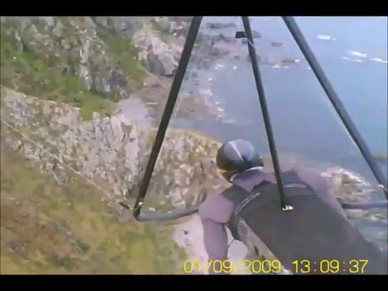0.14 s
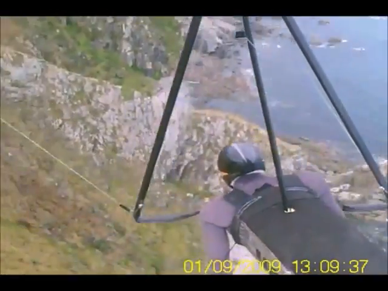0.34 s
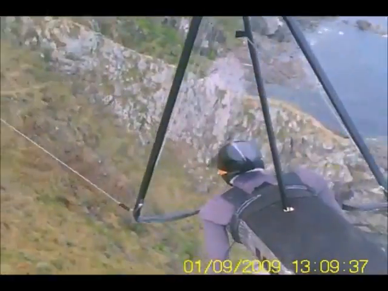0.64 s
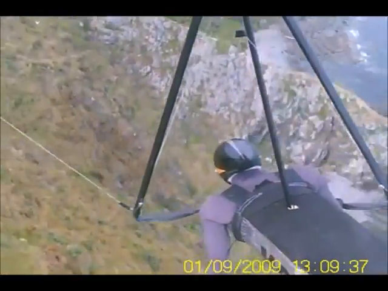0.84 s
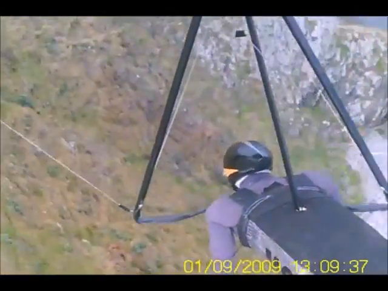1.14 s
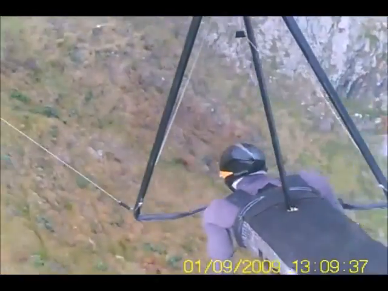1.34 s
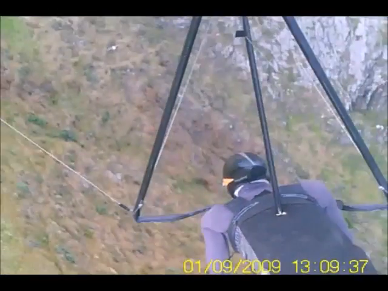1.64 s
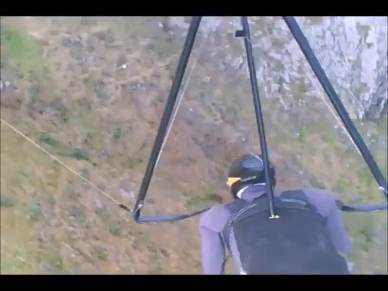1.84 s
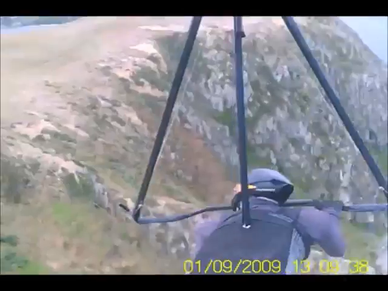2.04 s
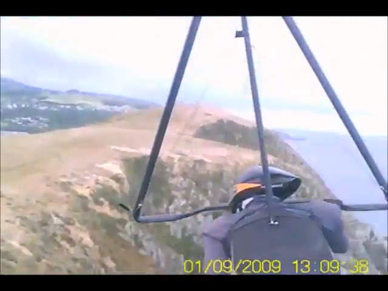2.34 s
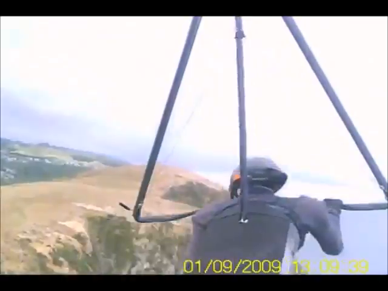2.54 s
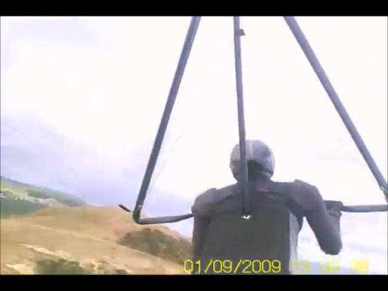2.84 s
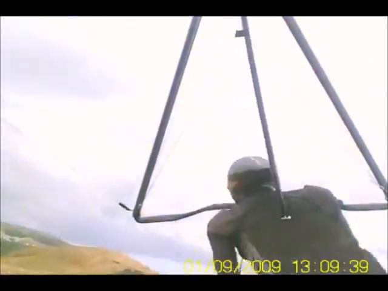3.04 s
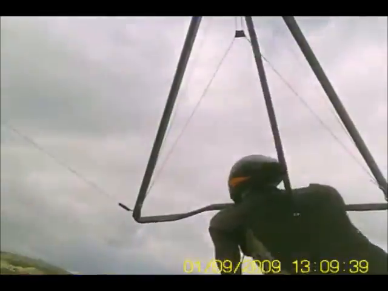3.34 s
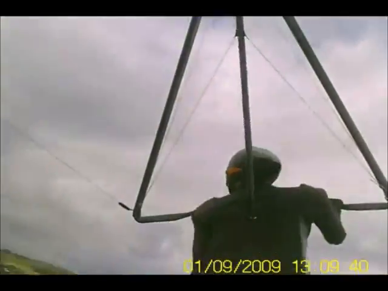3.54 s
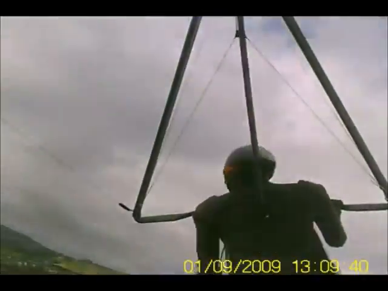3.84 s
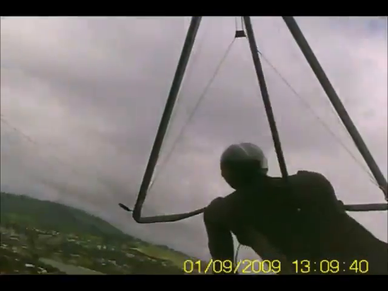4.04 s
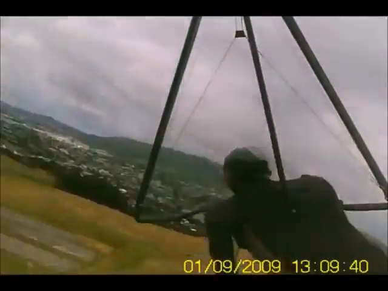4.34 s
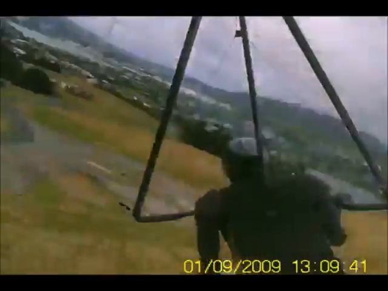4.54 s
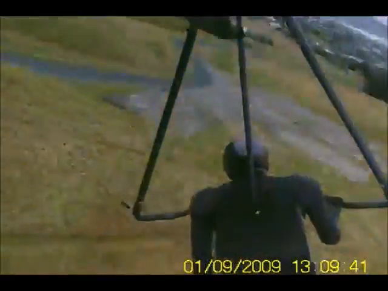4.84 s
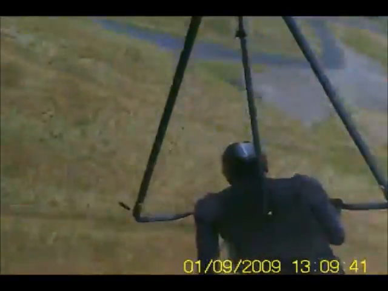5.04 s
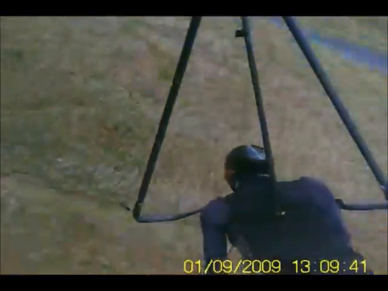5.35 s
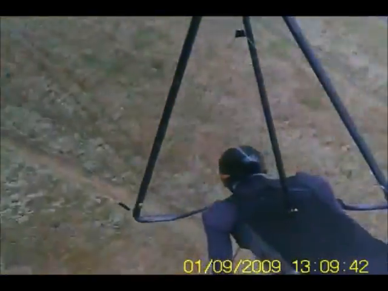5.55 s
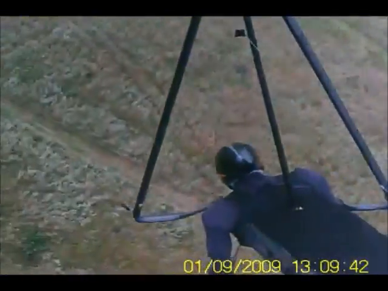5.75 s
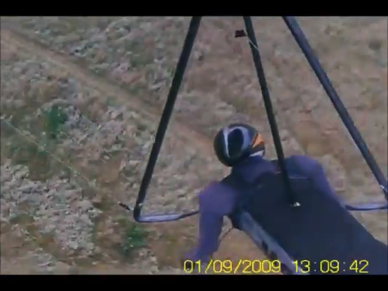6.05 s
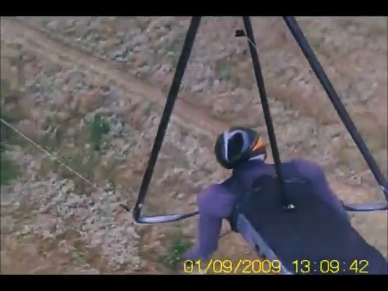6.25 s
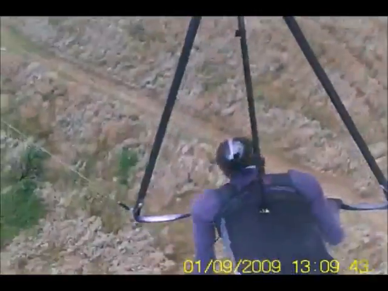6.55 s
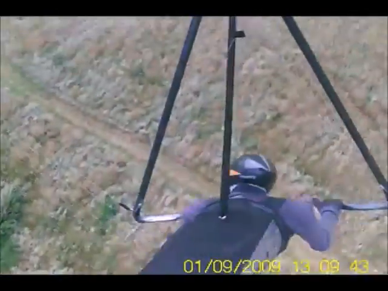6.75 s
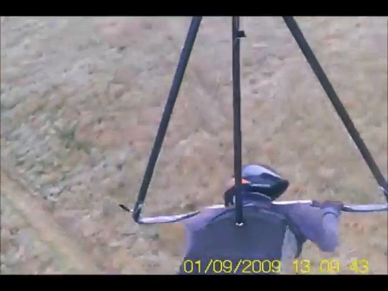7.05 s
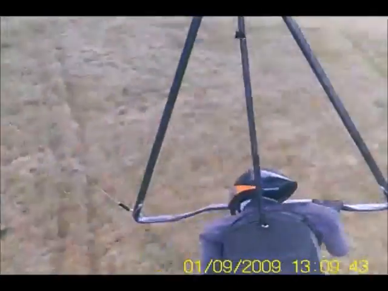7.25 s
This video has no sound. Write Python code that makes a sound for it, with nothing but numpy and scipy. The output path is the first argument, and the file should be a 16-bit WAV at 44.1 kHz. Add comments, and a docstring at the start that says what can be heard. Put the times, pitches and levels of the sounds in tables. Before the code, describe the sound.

Outdoors on a hang glider in flight, loud wind thumps and roars straight over a small microphone. It eases sharply after about three seconds, leaving a low rumble in which the frame knocks, clicks and creaks. Then the gusts build again to a rough, distorted blast with two sharp ticks and a tiny dropout, ending at its loudest.

```python
"""On the keel of a hang glider in flight rides a small camera. Air tears over its microphone port, eases at
the top of a climbing turn and swells again in the dive: six bands of shaped noise follow level curves.
In the lull the frame knocks and its joints creak through the mount: clicks and random slips ring damped modes.
At full blast the recorder overloads and clips, spits two sharp ticks and once dips briefly in level."""
import sys
import numpy as np
from scipy import signal
from scipy.io import wavfile

SR = 44100
rng = np.random.default_rng(int(sys.argv[2]) if len(sys.argv) > 2 else 0)


def dump(signal):
    """Clip the signal to [-1, 1] and save it as 16-bit WAV at the path in sys.argv[1]."""
    limited = np.clip(np.atleast_2d(signal).T, -1, 1)
    pcm = np.round(limited * 32767).astype(np.int16)
    wavfile.write(sys.argv[1], SR, pcm)


N = 325899

# Wind over the port, before flutter and eddies:
# [t/s, buffet level/dB, rush level/dB, roar level/dB, hiss level/dB]
AIR_LEVELS = [(0.0, -17.5, -18.5, -21.5, -37), (0.43, -17.5, -16.5, -22.5, -45),
              (1.0, -21, -16.5, -21.5, -38), (1.35, -20.5, -16, -19, -36), (1.6, -17.5, -20, -17, -29),
              (1.95, -24.5, -19.5, -17.5, -32.5), (2.25, -18.5, -15.5, -17, -32.5),
              (2.6, -19.5, -18.5, -22.5, -40.5), (2.91, -17.5, -19, -27, -46.5),
              (2.98, -20, -26.5, -29, -40.5), (3.17, -29, -30.5, -36, -50.5), (3.6, -23, -31, -37, -59),
              (3.88, -27.5, -30.5, -43.5, -55), (4.0, -26, -33.5, -42, -62), (4.4, -28.5, -31.5, -44, -64),
              (4.7, -28.5, -32, -41.5, -74), (4.92, -28.5, -30, -35.5, -56), (5.02, -26, -28, -31, -55),
              (5.1, -24, -25, -28.5, -47), (5.18, -24, -22.5, -29.5, -52), (5.3, -19, -30, -23.5, -48),
              (5.41, -20, -17, -27, -48), (5.46, -24, -20, -21.5, -57), (5.58, -27, -18.5, -27.5, -51),
              (5.66, -18.5, -17, -24, -56), (5.74, -20, -15, -24.5, -56), (5.81, -16, -13.5, -19.5, -44),
              (5.91, -20.5, -21.5, -21, -41), (6.15, -14, -21.5, -19.5, -38.5),
              (6.45, -18.5, -16, -14, -31.5), (6.7, -20, -14.5, -14.5, -34), (7.02, -16, -15, -12.5, -31.5),
              (7.17, -17.5, -19, -17.5, -31.5), (7.3, -20, -18, -13, -27), (7.39, -13, -11.5, -16, -29)]
# Low-middle body of the wind, before flutter and eddies: [t/s, level/dB]
BODY_LEVELS = [(0, -24.5), (.33, -23.5), (.8, -22), (1.38, -20.5), (1.61, -22), (2.26, -18.5),
               (2.55, -27.5), (2.65, -22.5), (2.9, -26.5), (3.13, -34.5), (3.5, -35), (3.8, -38.5),
               (4.1, -38.5), (4.35, -39), (4.61, -40), (4.9, -35), (5.15, -29.5), (5.5, -20.5),
               (5.86, -16.5), (5.92, -26), (6.09, -20.5), (6.28, -24.5), (6.47, -16.5), (6.81, -16.5),
               (7.02, -18.5), (7.16, -24), (7.39, -15)]
# Relative spectral density of each noise, from thump up to sizzle: [f/Hz, level per Hz/dB]
BUFFET_SPECTRUM = [(12, -22.5), (30, 3.5), (65, 2), (120, -4.5), (220, -14), (400, -30.5)]
RUSH_SPECTRUM = [(60, -9.5), (130, 1), (250, -1), (400, -3), (600, -14.5), (1000, -34)]
BODY_SPECTRUM = [(280, -10.5), (450, 1.5), (700, 1), (950, -6.5), (1400, -13)]
ROAR_SPECTRUM = [(500, -8.5), (800, 3), (1100, 5), (1400, 3), (1700, 2.5), (2300, -6), (3200, -15.5),
                 (5000, -30)]
HISS_SPECTRUM = [(1800, 5), (2800, -1), (3700, -2.5), (4600, -1), (5700, -19), (7000, -48)]
SIZZLE_SPECTRUM = [(4500, -13), (5700, -4), (7000, 4), (9000, -16.5), (11000, -6)]
PREAMP_SPECTRUM = [(1500, -8.5), (4000, -6), (8000, 0), (11000, -7.5)]
# Brief pulls of the waveform to near or past full scale, barely audible:
# [t/s, half width/s, height (full scale = 1)]
FULL_SCALE_PEAKS = [(1.1787, .0009, 1.05), (1.1823, .0004, -.97), (6.4782, .0003, -1.02),
                    (6.4867, .0003, 1.03), (6.515, .0003, -1.02), (6.754, .00025, 1.04),
                    (6.8734, .00025, -1.04), (6.9776, .00025, 1.04), (7.0105, .00025, 1.04),
                    (7.0208, .0003, 1.1), (7.1279, .00025, 1.05)]
# Rubbing in the joints: [start t/s, length/s, slip level/dB, singing f/Hz]
JOINT_RUBS = [(3.44, .05, -49, 1680), (3.685, .03, -50, 1730), (3.725, .09, -52, 1735),
              (3.83, .03, -52, 1600), (3.86, .07, -52, 1625), (3.87, .06, -53, 1715),
              (4.13, .03, -55, 1730), (4.28, .06, -52, 1650), (4.43, .03, -53, 1710), (4.5, .08, -55, 1680),
              (4.575, .06, -53, 1710), (4.72, .12, -56, 1640), (4.87, .1, -56, 1620)]
# Blows on the frame; where one lands sets its colour: [t/s, drive level/dB, then relative level/dB of
# lower modes, middle modes, upper modes, top modes and rattle]
FRAME_KNOCKS = [(3.4945, -15, -6, 0, -6, 2, -3), (3.5452, -22, -4, -10, -3, -14, 3),
                (3.698, -37, -6, -10, -10, -10, 0), (3.9694, -17, -5, -3, -7, -1, -2),
                (4.1897, -38, 18, -5, -9, -12, -2), (4.418, -25, -6, -12, -6, -9, -1),
                (4.448, -37, 3, -5, -8, -8, 0), (4.507, -27, -4, -5, -6, -3, 0),
                (4.6844, -21, 1, -4, 3, 0, 4.5), (4.735, -33, 0, -4, -8, -8, 2),
                (4.7822, -23, 0, -5, -10, -5, 2), (4.8277, -30, 2, -2, -4, -6, 0),
                (4.84, -25, -6, -10, -10, -10, 3), (4.8581, -14, 1, 1.5, -3, -2, 2),
                (5.022, -25, -3, -5, -5, -2, 2), (5.9722, -9.5, -2, 5, -12, -14, 5)]
# Modes of mount and tube: [f/Hz, relative level/dB, 60 dB decay time/s]
FRAME_MODES = [(900, -13, .012), (1150, -11, .012), (1370, -6, .02), (1615, 0, .03), (1730, -3, .022),
               (1960, -9, .018), (2150, -14, .01), (2320, -10, .024), (2520, -11, .026), (2900, -10, .022),
               (3300, -16, .007), (3740, -11, .013), (4080, -17, .009)]
# Contacts in one knock, about its t; those after it are rattle: [earliest/s, latest/s, relative level/dB]
KNOCK_CONTACTS = [(-.0012, -.0011, -8), (-.0005, -.0004, -3), (.0006, .0009, -8), (.003, .005, -14),
                  (.006, .009, -15), (.010, .014, -19), (.015, .022, -24)]
# Flips of the converter to the lower rail: [t/s, flip length/s]
CONVERTER_FLIPS = [(6.7257, .00019), (7.3724, .00019)]

FLUTTER_DB, FLUTTER_HZ = 0.87, 34   # spread and corner of the common flutter
HISS_BELOW_ROAR_DB = 27   # the hiss curve never sinks further under the roar curve
HISS_FULL_DB, ROAR_FULL_DB = -38, -18   # reference levels for the sizzle
SIZZLE_UNDER_DB = -14.5   # sizzle relative to the hiss at both reference levels
SIZZLE_WITH_HISS, SIZZLE_WITH_ROAR = 0.56, .55   # shares of their swings in dB
PREAMP_DB = -66.5   # before its own drift
RUB_FADE_S, SLIPS_PER_S = .02, 1500
CREAK_DB, RASP_DB = -5, 11   # slips driving the frame modes; dry airy edge of the slips
SING_T60_S = .085   # ring of the singing mode
MAIN_HZ, MIDDLE_HZ, UPPER_HZ, TOP_HZ = 1500, 1900, 2700, 3500   # where each group of modes begins
SNAP_S, SNAP_DB = 4.529, -22   # thin dry click, level before the low-passes
DIP_START_S, DIP_END_S, DIP_EDGE_S, DIP_DB = 6.5822, 6.6046, .0002, -18
CAPSULE_TOP = .96   # limit of the capsule's swing
OFFSET, CEILING = -.017, 1.0   # converter offset and full scale
INPUT_EDGE_HZ, CUTOFF_HZ = 10900, 16800   # passband edge of the input; stopband edge of the recorder


def from_db(db):
    """Logarithmic level: decibels become an amplitude ratio."""
    return 10 ** (np.asarray(db) / 20)


def rms_one(x):
    """Normalization: division by the root mean square gives unit power."""
    return x / np.sqrt(np.mean(x ** 2) + 1e-20)


def in_time(rows):
    """Linear interpolation: each column of a curve table gets one value a sample."""
    s, *columns = np.transpose(rows)
    return [np.interp(np.arange(N) / SR, s, c) for c in columns]


def band_pass(low, high, order, x):
    """Band limitation: a Butterworth filter passes low to high Hz."""
    return signal.sosfilt(signal.butter(order, [low, high], "band", fs=SR, output="sos"), x)


def drift(rate):
    """Low-passed chance: two equal poles with corner rate/Hz smooth noise to a curve of spread 1."""
    step = 40   # samples between slow values
    r = np.exp(-2 * np.pi * step * rate / SR)
    noise = rng.standard_normal(N // step + 2002)
    slow = signal.lfilter([1], [1, -2 * r, r * r], noise)[2000:]   # settled part only
    return np.interp(np.arange(N) / step, np.arange(len(slow)), rms_one(slow))


def eddies(spectrum, gust_db, own_db, rate):
    """Turbulence in third-octave bands: gusts shake all bands together, eddies each band alone."""
    hz, level_db = np.transpose(spectrum)
    edges = hz[0] * 2 ** (np.arange(3 * np.log2(hz[-1] / hz[0]) + 1) / 3)
    white = rng.standard_normal((2, N + SR))   # neighbouring bands take different noise
    gust = gust_db * drift(rate)
    out = 0
    for k, (low, high) in enumerate(zip(edges, edges[1:])):
        band = band_pass(low, high, 3, white[k % 2])[SR:]   # the first second settles the filter
        centre_db = np.interp(np.log(low * high) / 2, np.log(hz), level_db)
        out = out + from_db(centre_db + gust + own_db * drift(rate)) * band
    return rms_one(out)


def wind():
    """Turbulent pressure: big slow eddies thump the diaphragm, small ones rush and roar, the port edge hisses."""
    buffet_db, rush_db, roar_db, hiss_db = in_time(AIR_LEVELS)
    body_db, = in_time(BODY_LEVELS)
    hiss_db = np.maximum(hiss_db, roar_db - HISS_BELOW_ROAR_DB)
    sizzle_db = HISS_FULL_DB + SIZZLE_UNDER_DB
    sizzle_db = sizzle_db + SIZZLE_WITH_HISS * (hiss_db - HISS_FULL_DB)
    sizzle_db = sizzle_db + SIZZLE_WITH_ROAR * (roar_db - ROAR_FULL_DB)
    flutter = from_db(FLUTTER_DB * drift(FLUTTER_HZ))
    return flutter * (
        from_db(buffet_db) * eddies(BUFFET_SPECTRUM, gust_db=-0.3, own_db=1.8, rate=4.2)
        + from_db(rush_db) * eddies(RUSH_SPECTRUM, gust_db=0.82, own_db=0.43, rate=4.7)
        + from_db(body_db) * eddies(BODY_SPECTRUM, gust_db=0.3, own_db=0.75, rate=17.0)
        + from_db(roar_db) * eddies(ROAR_SPECTRUM, gust_db=0.2, own_db=1.47, rate=19.0)
        + from_db(hiss_db) * eddies(HISS_SPECTRUM, gust_db=1.4, own_db=.8, rate=14.0)
        + from_db(sizzle_db) * eddies(SIZZLE_SPECTRUM, gust_db=1.4, own_db=.8, rate=14.0))


def preamp_hiss():
    """Electronic noise: a faint shaped hiss that the wind curves leave alone."""
    return from_db(PREAMP_DB) * eddies(PREAMP_SPECTRUM, gust_db=.5, own_db=.5, rate=8.0)


def full_scale_peaks(x):
    """Crossfade to a set height: brief bell-shaped pulls bring the waveform near or past full scale."""
    t = np.arange(N) / SR
    for s, width, height in FULL_SCALE_PEAKS:
        x = x + np.exp(-((t - s) / width) ** 2) * (height - x)
    return x


def joint_slips():
    """Stick-slip friction: random slips are scaled by a joint pressure that fades in, holds and fades out."""
    t = np.arange(N) / SR
    slips = (rng.random(N) < SLIPS_PER_S / SR) * rng.standard_normal(N)
    rubs = []
    for s, length, db, _ in JOINT_RUBS:
        pressure = np.clip(np.minimum(t - s, s + length - t) / RUB_FADE_S + .5, 0, 1)
        rubs.append(slips * from_db(db) * pressure)
    return rubs


def knock_clicks(hz):
    """Impulsive excitation: blows and their rattling contacts, as they drive the mode at hz."""
    s, drive_db, lower_db, middle_db, upper_db, top_db, rattle_db = np.transpose(FRAME_KNOCKS)
    if hz > TOP_HZ:
        group_db = top_db
    elif hz > UPPER_HZ:
        group_db = upper_db
    elif hz > MIDDLE_HZ:
        group_db = middle_db
    else:
        group_db = 0 if hz > MAIN_HZ else lower_db
    mode_drive_db = drive_db + group_db + rng.normal(0, 1.5, len(s))
    clicks = np.zeros(N)
    for earliest, latest, contact_db in KNOCK_CONTACTS:
        at = s + earliest + (latest - earliest) * rng.random(len(s))
        clicks[(at * SR).astype(int)] += from_db(mode_drive_db + contact_db + (earliest > 0) * rattle_db)
    return clicks


def ring(clicks, hz, t60):
    """Damped resonance: a unit click starts a decaying sine of initial amplitude 1."""
    r, w = from_db(-60 / (t60 * SR)), 2 * np.pi * hz / SR
    return signal.lfilter([0, np.sin(w)], [1, -2 * r * np.cos(w), r * r], clicks + 1e-18)


def frame():
    """Modal superposition: knocks and the slips of rubbing joints drive the same modes."""
    rubs = joint_slips()
    creak = sum(rubs)
    modes = np.zeros(N)
    for hz, mode_db, t60 in FRAME_MODES:
        drive = creak * from_db(CREAK_DB) + knock_clicks(hz)
        modes += from_db(mode_db) * ring(drive, hz, t60)
    # each rub also sings on a long-lived tube mode that shifts with the load
    for rub, (*_, hz) in zip(rubs, JOINT_RUBS):
        modes += ring(rub, hz, SING_T60_S)
    rasp = from_db(RASP_DB) * band_pass(2600, 6000, 2, creak)
    # the padded mount passes neither the thud nor the edge of a blow
    mount = signal.cheby2(6, 45, [600, 4900], "band", fs=SR, output="sos")
    return rasp + signal.sosfilt(mount, modes)


def snap():
    """Unit impulse: one sample of equal energy at all frequencies is a thin dry click."""
    click = np.zeros(N)
    click[int(SNAP_S * SR)] = from_db(SNAP_DB)
    return click


def level_dip():
    """Attenuation: a gain curve by which the level falls away briefly."""
    t = np.arange(N) / SR
    depth = np.clip(np.minimum(t - DIP_START_S, DIP_END_S - t) / DIP_EDGE_S, 0, 1)
    return from_db(DIP_DB * depth)


def overflow(x):
    """Numerical overflow: the wave climbs to full scale, jumps to the lower rail and comes back."""
    t = np.arange(N) / SR
    for s, length in CONVERTER_FLIPS:
        climb = np.exp(-np.abs(t - s - length / 2) / 0.000099) * 3.6
        x = x + np.minimum(climb, 1) * (CEILING - x)
        x = x - 2 * CEILING * ((t >= s) & (t < s + length))
    return x


def scene():
    """Superposition: wind, frame, preamplifier hiss and the click share a narrow input band."""
    port = (wind() + frame()) * level_dip()
    port = port / (1 + (port / CAPSULE_TOP) ** 8) ** (1 / 8)   # the capsule rounds off the largest swings
    port = port + preamp_hiss() + snap()
    input_band = signal.ellip(10, .5, 80, INPUT_EDGE_HZ, fs=SR, output="sos")
    return signal.sosfilt(input_band, port)[None]


def record(dry):
    """Saturation and band limit: offset, hard clipping, converter flips, dulled treble, top cut."""
    hot = overflow(np.clip(full_scale_peaks(dry + OFFSET), -CEILING, CEILING))
    dull = signal.sosfilt(signal.butter(3, 11800, fs=SR, output="sos"), hot)
    top_cut = signal.cheby2(10, 60, CUTOFF_HZ, fs=SR, output="sos")
    return np.clip(signal.sosfilt(top_cut, dull), -1, 1)


dry = scene()
out = record(dry)
dump(out)
```